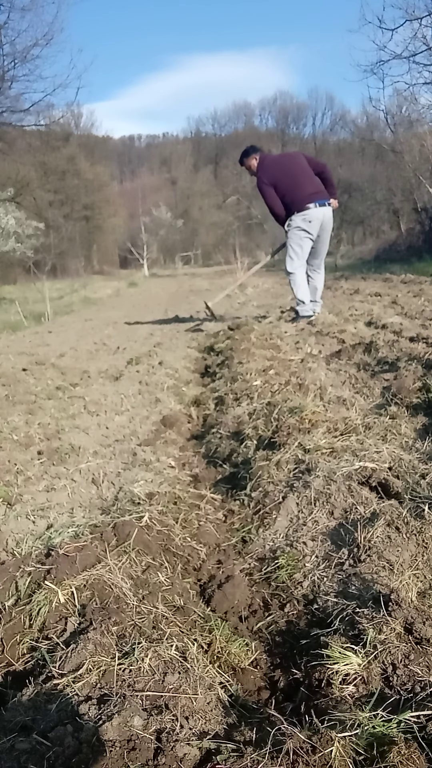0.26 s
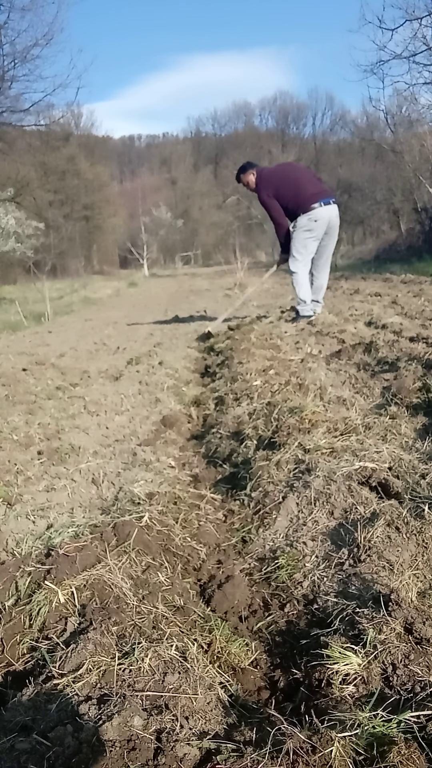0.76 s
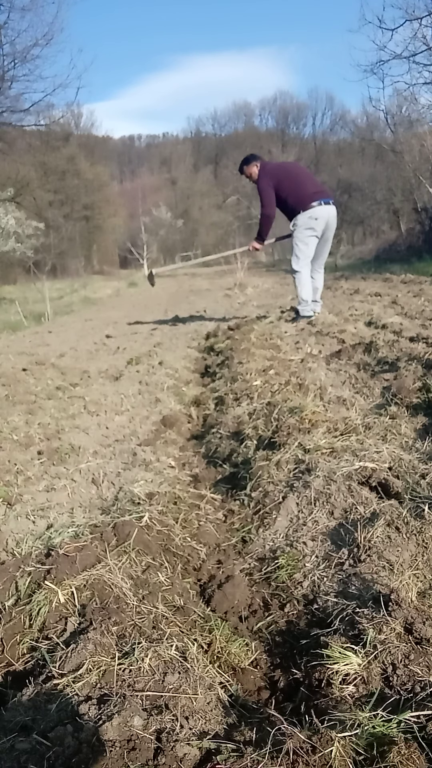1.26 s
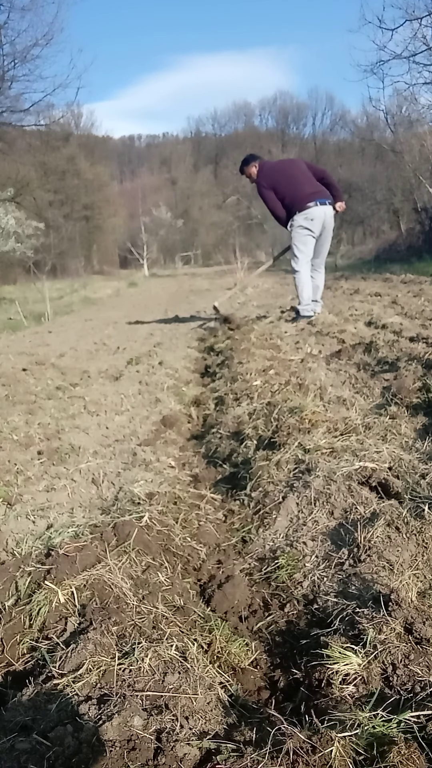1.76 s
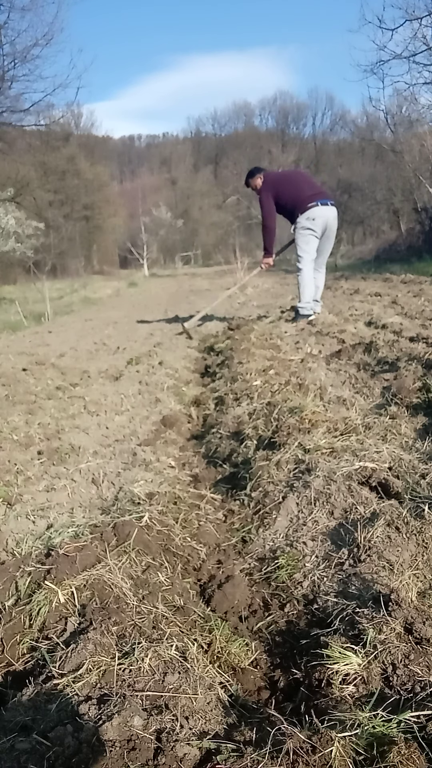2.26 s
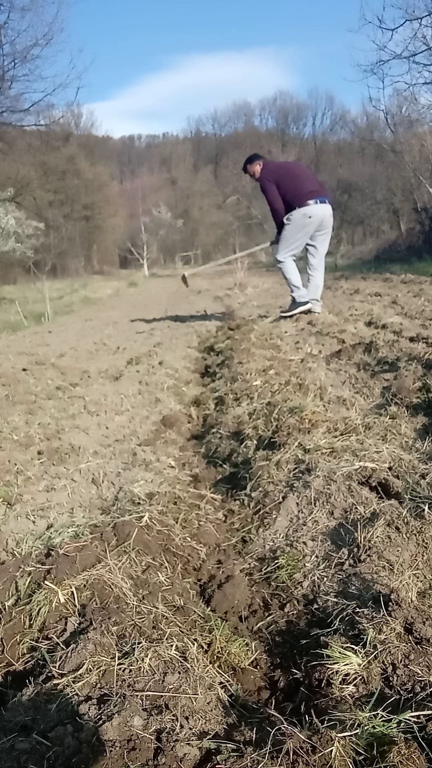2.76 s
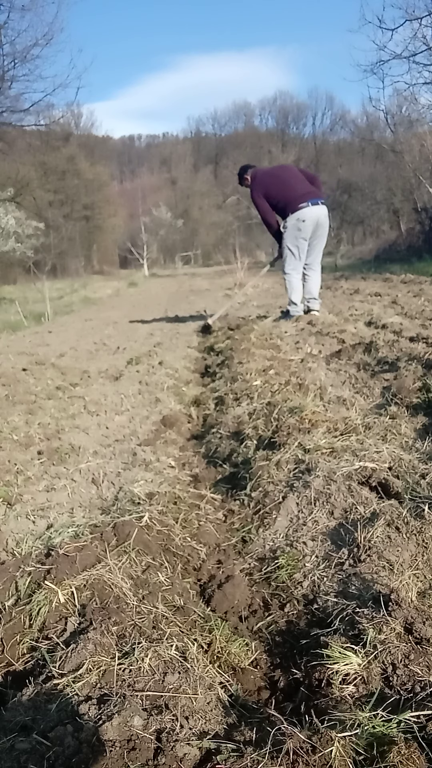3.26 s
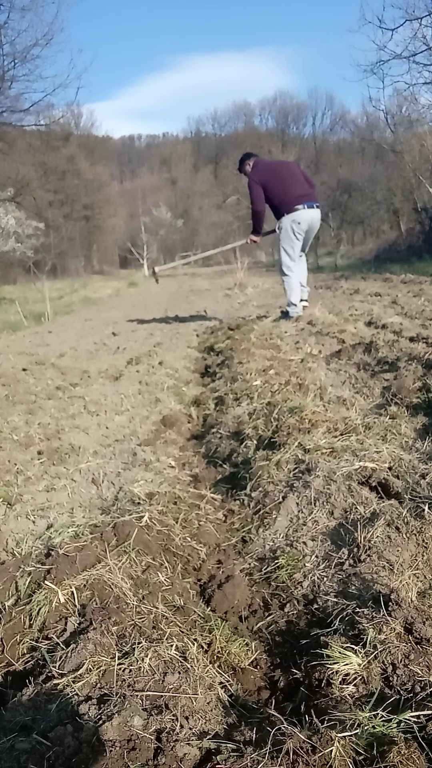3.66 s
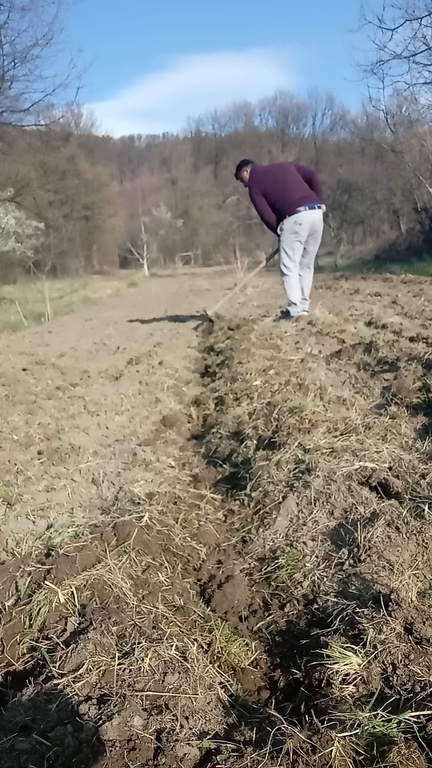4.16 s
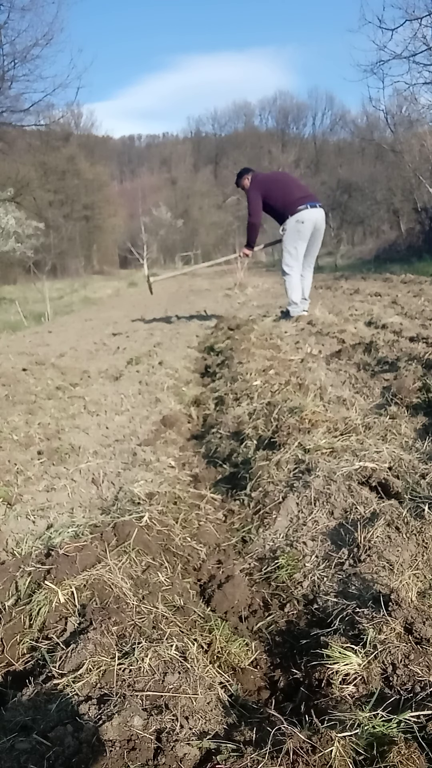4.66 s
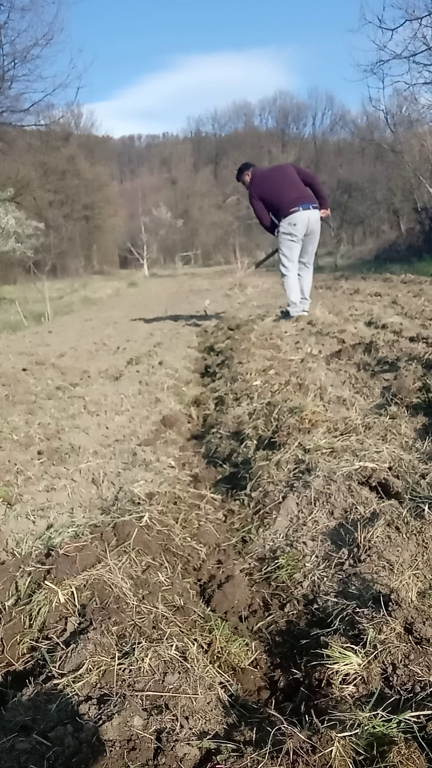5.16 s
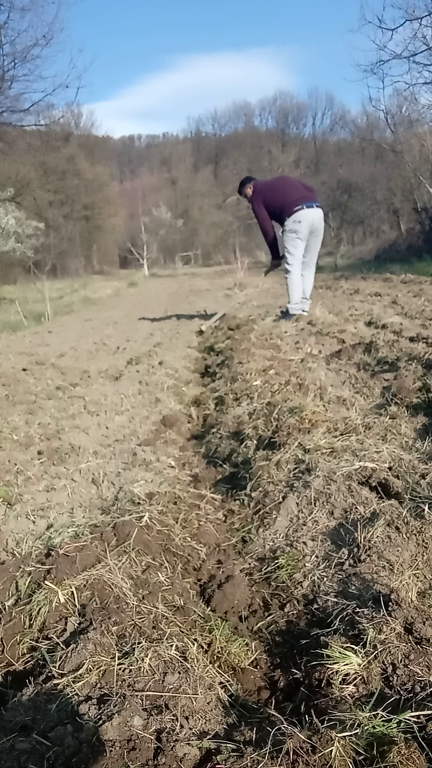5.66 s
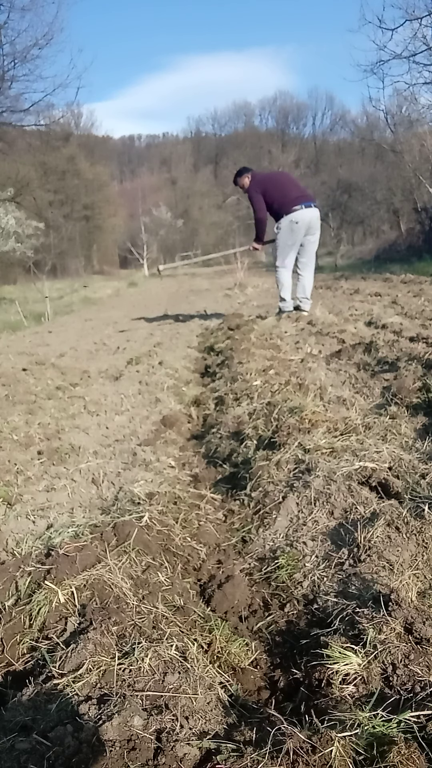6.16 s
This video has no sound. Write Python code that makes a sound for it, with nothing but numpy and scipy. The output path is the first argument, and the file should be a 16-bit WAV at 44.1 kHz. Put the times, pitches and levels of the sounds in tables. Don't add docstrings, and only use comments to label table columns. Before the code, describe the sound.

A phone's low vibration buzz runs one second on, one second off, over faint outdoor drone, while a distant hoe clicks on soil and stones.

```python
import sys
import numpy as np
from scipy import signal
from scipy.fft import rfft, irfft, next_fast_len
from scipy.io import wavfile
from scipy.ndimage import uniform_filter1d

SR = 44100
rng = np.random.default_rng(int(sys.argv[2]) if len(sys.argv) > 2 else 0)


def bounce(signal):
    frames = np.transpose(np.atleast_2d(signal))
    limited = np.clip(frames, -1, 1)
    pcm = np.round(limited * 32767).astype(np.int16)
    wavfile.write(sys.argv[1], SR, pcm)


def convert_level_to_amplitude(level_db):
    exponent = np.asarray(level_db, float) / 20
    return 10 ** exponent


N = 283563
TIME = np.arange(N) / SR

# pitch_hz, density_db
ROAD_COLOUR = [(120, -54), (200, -18), (366, -17.5), (401, -22), (529, -12.5), (635, -7.5), (806, -9),
               (1000, -2.5), (1450, -9), (1980, -18), (2130, -26), (3970, -35), (4600, -34), (7830, -43.5),
               (16000, -55)]
# time_s, level_db
TRAFFIC = [(.45, -0.5), (.75, -1.5), (1.05, 0.5), (1.4, 0.5), (2.45, 2.5), (2.7, 2), (3.0, -1.5), (3.4, 1),
           (4.5, 0), (4.9, -2), (5.15, -1.5), (5.45, 2)]
# time_s, level_db
GUSTS = [(0.0, -61.5), (1.43, -71), (1.57, -63), (3.42, -68), (3.47, -60.5), (4.53, -60), (4.87, -67.5),
         (4.96, -59), (5.03, -63), (5.1, -52), (5.21, -82), (5.26, -63), (5.94, -64.5), (6.43, -55.5)]
# pitch_hz, density_db
WIND_COLOUR = [(13, -55), (22, -42.5), (44, -15.5), (64, -0.5), (78, -6), (92, -11), (129, -8.5),
               (152, -17.5), (260, -30), (340, -62.5), (570, -120)]
# start_s, peak_db, pitch_hz, t60_s
PUFFS = [
    (0.763, -29, 64, 0.014),
    (0.789, -51.5, 72.7, 0.042),
    (4.942, -47, 103, 0.094),
    (4.99, -52.5, 108, 0.11),
    (5.082, -33, 136, 0.036),
    (5.105, -46, 85, 0.12),
    (5.328, -56, 68, 0.11),
    (5.362, -51, 120, 0.044),
]
# start_s, peak_db, clack_db (below 3 kHz), grit_db (above 4.4 kHz), length_s
BLOWS = [(0.7246, -34, -6, -25, 0.0014), (0.729, -48.5, 5, -18, 0.0034), (0.7452, -46.5, 13, -33, 0.0039),
         (0.7497, -50, 11, -36, .004), (0.868, -58, -30, -12, .002), (0.882, -79, -15, -25, 0.0013),
         (2.318, -53.5, 10, -25, 0.0041), (3.1957, -51, 5, -5, 0.0033), (3.205, -62, 12, -18, 0.0084),
         (3.213, -52.5, 8, -6, 0.0022), (3.2175, -57.5, 13.5, -25, 0.0046), (3.334, -79, 12, -22, 0.0031),
         (4.016, -47, -1, -16, .004), (4.0214, -45, 6, -31, 0.0043), (4.8184, -41.5, -10, -15, 0.0026),
         (4.8228, -47.5, 12.5, -17, 0.0028), (5.67, -55, 5.5, -32, 0.011)]
# pitch_hz, width_hz, level_db
BLADE_CLACK = [(1678, 21, 17), (2110, 79, 5.5), (2560, 470, 6), (2800, 200, -22)]
# pitch_hz, level_db, t60_s
STEEL_MODES = [(3050, 2, .12), (3780, -3, .14), (4280, -8, .1), (4510, -1, .2), (4570, -1, .17),
               (6500, -8, .08), (7360, 0, .11), (8650, -7, .08)]
# pitch_hz, density_db
EARTH_COLOUR = [(1180, -10), (2000, 0), (2570, -10.5), (3040, 2), (3550, -6), (4410, -6), (7380, -10),
                (9250, -25.5), (12500, -52), (16000, -42)]
# on_s, off_s, top_speed_hz, knock_s (until the shaft runs true)
MOTOR_RUNS = [
    (-.566, .424, 187.7, .3),
    (1.434, 2.425, 188.05, .56),
    (3.437, 4.428, 188, .32),
    (5.444, 6.444, 188.1, .31),
]
STRONG_MULTIPLES = {3: -35, 5: -24, 6: -36.5, 7: -32, 8: -21, 9: -29, 11: -35, 12: -39, 13: -33, 14: -42,
                    15: -37, 17: -31, 20: -33, 22: -38, 24: -33, 26: -31, 27: -36, 30: -35, 32: -32, 35:
                    -39, 41: -44, 48: -55, 49: -57, 53: -58, 55: -59, 56: -57, 58: -59, 60: -59, 64: -59,
                    66: -60}
# pitch_hz (at top speed), level_db
FAINT_MULTIPLES = [(375, -42), (1875, -54), (3000, -56), (3560, -40), (5440, -41), (8450, -60),
                   (13200, -74), (15600, -66)]
# pitch_hz, width_hz, level_db
CASE_RESONANCES = [(1380, 300, 8), (2150, 165, 13.5), (3030, 150, -9), (4400, 1200, 7)]
# pitch_hz, density_db
BRUSH_COLOUR = [(880, -21), (1500, 0), (1900, -15.5), (2160, -4), (2540, -21.5), (2800, -9.5),
                (3050, -15.5), (3800, -9.5), (6630, -12.5), (8080, -25), (9750, -29), (13600, -47),
                (15400, -38), (17000, -60.5)]
# pitch_hz, density_db
SHUDDER_COLOUR = [(90, -25.5), (140, 0), (190, -1.5), (240, -2), (290, -7), (340, -22), (420, -41),
                  (900, -95)]
# start_s,
# peak_db
DRY_TICKS = [(1.4334, -43.5), (1.4404, -42.5), (1.448, -52), (1.4574, -45), (1.5284, -43), (2.5594, -47),
             (3.4343, -40), (3.439, -50), (5.4394, -44.5), (5.4485, -44), (5.4515, -42.5)]

ROAD_DB, FLICKER_DB, BRIGHT_DB = -68.5, 4, 0.4
RING_DB, RING_PER_CLACK = -15, -0.34
RING_ON_DB = -26
EARTH_DB, EARTH_T60_S, EARTH_LATE_S = -15.5, 0.26, 0.013
SPIN_S = 0.052
SETTLE_HZ, SETTLE_S = 5.5, 0.33
COAST_S, COAST_LAG_S, DRY_FRICTION = 0.07, 0.02, 0.06
HUM_DB, HUM_FULL_HZ, HUM_DB_PER_HZ = -38, 173.7, 0.5
HUM_OFF_DB, HUM_OFF_DB_PER_HZ = -40, 0.21
WHINE_DB, WHINE_LAG_DB, WHINE_OFF_DB, WHINE_OFF_LAG_DB = -0.5, -48, -14, -60
SCRAPE_START_DB, SCRAPE_PEAK_DB, SCRAPE_DB = -65.5, -56.5, -70
SCRAPE_PEAK_S, SCRAPE_CALM_S = 0.1, 0.07
SCRAPE_OFF_DB, SCRAPE_KNEE, JOLT_DB, JOLT_S = -63, 0.3, 5, 0.0051
LAST_MULTIPLE = 83
CONTACTS, INRUSH_DB = 12, 7
KNOCK_DB, KNOCK_HZ, KNOCK_WIDTH_HZ, KNOCK_FADE_S = -35, 4300, 1700, 0.02
RATTLE_DB, RATTLE_LO_HZ, RATTLE_HI_HZ = -32.5, 474, 1570
ROCK_LATE_S, ROCK_DB, ROCK_HZ, ROCK_T60_S = 0.035, -52.5, 137, 0.3
TICK_S = 0.001
HISS_DB = -103
MIC_LOW_HZ, TREBLE_END_HZ = 39.5, 15740
MIC_PEAK_HZ, MIC_PEAK_WIDTH_HZ, MIC_PEAK_DB = 15400, 480, -3.5


def band(x, lo_hz, hi_hz):
    edges = [lo_hz, min(hi_hz, 0.45 * SR)]
    return signal.sosfilt(signal.butter(3, edges, "band", fs=SR, output="sos"), x)


def lowpass(x, hz):
    return signal.sosfiltfilt(signal.butter(2, hz, fs=SR, output="sos"), x)


def ring(x, hz, width_hz):
    return signal.lfilter(*signal.iirpeak(hz, hz / width_hz, SR), x)


def unit(x):
    return x / np.sqrt(np.mean(x ** 2))


def noise(colour):
    pitch_hz, density_db = np.transpose(colour)
    size = next_fast_len(N)
    grid_hz = np.arange(size // 2 + 1) * SR / size + 1
    gain = convert_level_to_amplitude(np.interp(np.log(grid_hz), np.log(pitch_hz), density_db))
    return unit(irfft(rfft(rng.standard_normal(size)) * gain, size)[:N])


def walk(rate_hz):
    hold = int(SR / rate_hz)
    steps = np.repeat(rng.standard_normal(N // hold + 1), hold)
    return unit(uniform_filter1d(uniform_filter1d(steps, hold), hold)[:N])


def bursts(starts_s, peaks_db, lengths_s, rise):
    out, age = np.zeros(N + SR), TIME[:SR // 10]
    for start_s, peak_db, length_s in zip(starts_s, peaks_db, lengths_s):
        shape = (1 - np.exp(-age / (rise * length_s))) * np.exp(-age / length_s)
        out[int(start_s * SR):][:len(age)] += convert_level_to_amplitude(peak_db) * shape
    return out[:N]


def field():
    drone = noise(ROAD_COLOUR)
    swell_db = np.interp(TIME, *np.transpose(TRAFFIC))
    bright_db = BRIGHT_DB * walk(2.1)
    edges_hz = 477, 644, 810, 970, 1300, 1710, 2270
    below = [0] + [lowpass(drone, hz) for hz in edges_hz] + [drone]
    tilts = 0, -1, -1, -0.5, 0.5, 1, 1, 0
    out = 0
    for lo, hi, tilt in zip(below, below[1:], tilts):
        flicker_db = FLICKER_DB * (1 if tilt else 0.5) * walk(8)
        level_db = ROAD_DB + swell_db + tilt * bright_db + 0.28 * walk(1.2) + flicker_db
        out = out + convert_level_to_amplitude(level_db) * (hi - lo)
    return out


def wind():
    gust_db = np.interp(TIME, *np.transpose(GUSTS)) + walk(23)
    out = convert_level_to_amplitude(gust_db) * noise(WIND_COLOUR)
    for start_s, peak_db, pitch_hz, t60_s in PUFFS:
        age = np.clip(TIME - start_s, 0, None)
        swell = (1 - np.exp(-age / 0.0051)) * 1000 ** (-age / t60_s)
        out = out + convert_level_to_amplitude(peak_db + 5) * swell * np.sin(2 * np.pi * pitch_hz * age / (1 + 5 * age))
    return out


def hoe():
    start_s, peak_db, clack_db, grit_db, length_s = np.transpose(BLOWS)

    def contact(more_db):
        return bursts(start_s, peak_db + more_db, length_s, rise=0.38)

    grains = rng.standard_normal(N) * convert_level_to_amplitude(1.8 * rng.exponential(size=N))
    clack = unit(sum(convert_level_to_amplitude(db) * ring(grains, hz, width_hz) for hz, width_hz, db in BLADE_CLACK))
    crack = unit(band(grains, 3090, 7480))
    grit = unit(band(grains, 4400, 11000)) + convert_level_to_amplitude(1) * unit(band(grains, 14300, 16000))
    blow = contact(0)
    blade = contact(clack_db) * clack + blow * crack + contact(grit_db) * grit

    age = TIME[:SR // 2]
    late = np.clip(age - EARTH_LATE_S, 0, None)
    decay = np.sign(late) * 1000 ** (-2 * late / EARTH_T60_S)
    patter = np.sqrt(signal.fftconvolve(blow ** 2, decay)[:N].clip(0) / 100)
    earth = convert_level_to_amplitude(EARTH_DB + 2 * walk(120)) * patter * noise(EARTH_COLOUR)

    modes = sum(convert_level_to_amplitude(db) * np.sin(2 * np.pi * hz * age) * 1000 ** (-age / t60_s)
                for hz, db, t60_s in STEEL_MODES)
    strike = contact(RING_DB + RING_PER_CLACK * clack_db) * crack
    sliding = convert_level_to_amplitude(RING_ON_DB) * patter * unit(grains)
    steel = signal.fftconvolve(strike + sliding, modes)[:N]
    return convert_level_to_amplitude(-3) * blade + convert_level_to_amplitude(-35) * steel + earth


def rotor():
    hz = np.zeros(N)
    hum_db, whine_db, scrape_db = np.full((3, N), -120.)
    stop_s = COAST_S * np.log(1 + 1 / DRY_FRICTION) + COAST_LAG_S
    for on_s, off_s, top_hz, _ in MOTOR_RUNS:
        powered = (TIME >= on_s) & (TIME < off_s)
        a = TIME[powered] - on_s
        settle = SETTLE_HZ / top_hz
        up = 1 - np.exp(-a / SPIN_S) * (1 - settle) - np.exp(-a / SETTLE_S) * settle
        hz[powered] = top_hz * up
        hum_db[powered] = HUM_DB - HUM_DB_PER_HZ * np.clip(HUM_FULL_HZ - hz[powered], 0, None)
        whine_db[powered] = WHINE_DB + WHINE_LAG_DB * (1 - up)
        rising = SCRAPE_START_DB + (SCRAPE_PEAK_DB - SCRAPE_START_DB) * a / SCRAPE_PEAK_S
        calming = SCRAPE_DB + (SCRAPE_PEAK_DB - SCRAPE_DB) * np.exp((SCRAPE_PEAK_S - a) / SCRAPE_CALM_S)
        scrape_db[powered] = np.minimum(rising, calming)

        coasting = (TIME >= off_s) & (TIME < off_s + stop_s)
        b = TIME[coasting] - off_s
        drag = np.exp(-b ** 2 / (b + COAST_LAG_S) / COAST_S)
        down = np.clip((1 + DRY_FRICTION) * drag - DRY_FRICTION, 0, 1)
        hz[coasting] = top_hz * down
        hum_db[coasting] = HUM_OFF_DB - HUM_OFF_DB_PER_HZ * (top_hz - hz[coasting])
        whine_db[coasting] = WHINE_OFF_DB + WHINE_OFF_LAG_DB * (1 - down)
        fading = down / (down + SCRAPE_KNEE) + 1e-4
        scrape_db[coasting] = SCRAPE_OFF_DB + 20 * np.log10(fading) + JOLT_DB * np.exp(-b / JOLT_S)
    unrest_hz = 0.1 + 0.006 * (hz.max() - hz)
    speed_hz = hz * (1 + unrest_hz * walk(40) / hz.max())
    return speed_hz, uniform_filter1d(hum_db, size=200), whine_db, scrape_db


def case_db(hz):
    return sum(db / (1 + (2 * (hz - centre_hz) / width_hz) ** 4)
               for centre_hz, width_hz, db in CASE_RESONANCES)


def whine(hz, turn):
    out, coarse = 0, np.arange(0, N, 64)
    time, slow_hz, top_hz = TIME[coarse], hz[coarse], hz.max()
    steady_hz = MOTOR_RUNS[2][2]
    faint_hz, faint_db = np.transpose(FAINT_MULTIPLES)
    starting = np.clip((top_hz - slow_hz) / 4, 0, 1)
    loose = sum((time > on_s) * np.clip((on_s + knock_s - time) / KNOCK_FADE_S, 0, 1)
                for on_s, _, _, knock_s in MOTOR_RUNS)
    step = wheel = np.exp(1j * turn)
    for k in range(2, LAST_MULTIPLE + 1):
        wheel = wheel * step
        other_db = np.interp(np.log(k * top_hz), np.log(faint_hz), faint_db)
        level_db = STRONG_MULTIPLES.get(k, other_db)
        sweep_db = case_db(k * slow_hz) - case_db(k * steady_hz)
        sweep_db = sweep_db + (k == CONTACTS) * INRUSH_DB * starting
        knock_hump = 1 + (2 * (k * slow_hz - KNOCK_HZ) / KNOCK_WIDTH_HZ) ** 4
        knock = loose * convert_level_to_amplitude(KNOCK_DB) / knock_hump
        shimmer_db = 0.9 * unit(uniform_filter1d(rng.standard_normal(len(coarse)), size=25))
        level = convert_level_to_amplitude(shimmer_db) * np.hypot(convert_level_to_amplitude(sweep_db + level_db), knock)
        phase = np.exp(2j * np.pi * rng.random())
        out = out + np.interp(TIME, time, level) * (wheel * phase).real
    return np.sqrt(2) * out


def motor():
    hz, hum_db, whine_db, scrape_db = rotor()
    turn = 2 * np.pi * np.cumsum(hz) / SR
    shudder = convert_level_to_amplitude(-27) * noise(SHUDDER_COLOUR)
    imbalance = np.sqrt(2) * convert_level_to_amplitude(0.21 * walk(45)) * np.cos(turn)
    rattle = convert_level_to_amplitude(RATTLE_DB) * unit(band(rng.standard_normal(N), RATTLE_LO_HZ, RATTLE_HI_HZ))
    hum = convert_level_to_amplitude(hum_db) * (shudder - imbalance + rattle)
    for _, off_s, *_ in MOTOR_RUNS:
        age = np.clip(TIME - off_s - ROCK_LATE_S, 0, None)
        hum = hum + convert_level_to_amplitude(ROCK_DB) * 1000 ** (-age / ROCK_T60_S) * np.sin(2 * np.pi * ROCK_HZ * age)
    segments = 1 + 0.3 * np.sin(3 * turn)
    scrape = convert_level_to_amplitude(scrape_db + 1.5 * walk(60)) * segments * noise(BRUSH_COLOUR)
    start_s, peak_db = np.transpose(DRY_TICKS)
    jerks = bursts(start_s, peak_db, np.full(len(start_s), TICK_S), rise=0.086)
    ticks = band(jerks * rng.choice([-1., 1.], N), 3000, 7650)
    return hum + convert_level_to_amplitude(whine_db + HUM_DB) * whine(hz, turn) + scrape + ticks


def scene():
    return (field() + wind() + hoe() + motor())[None]


def top_cut(x):
    return signal.sosfilt(signal.butter(12, 17060, fs=SR, output="sos"), x)


def record(dry):
    x = dry + convert_level_to_amplitude(HISS_DB) * rng.standard_normal(N)
    x = signal.sosfilt(signal.butter(2, MIC_LOW_HZ, "high", fs=SR, output="sos"), x)
    x = x + convert_level_to_amplitude(MIC_PEAK_DB) * ring(x, MIC_PEAK_HZ, MIC_PEAK_WIDTH_HZ)
    x = signal.sosfilt(signal.ellip(10, 0.2, 60, TREBLE_END_HZ, fs=SR, output="sos"), x)
    return top_cut(x)


dry = scene()
out = record(dry)
bounce(out)
```